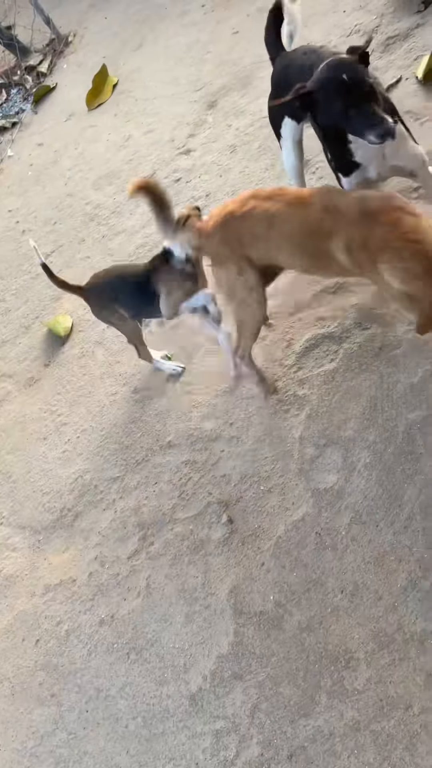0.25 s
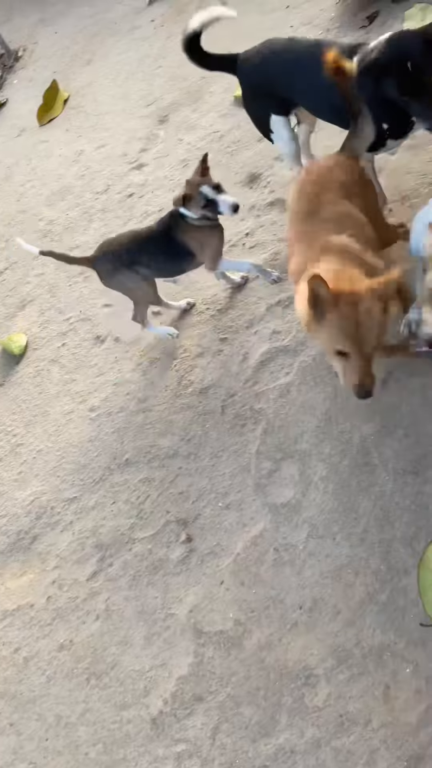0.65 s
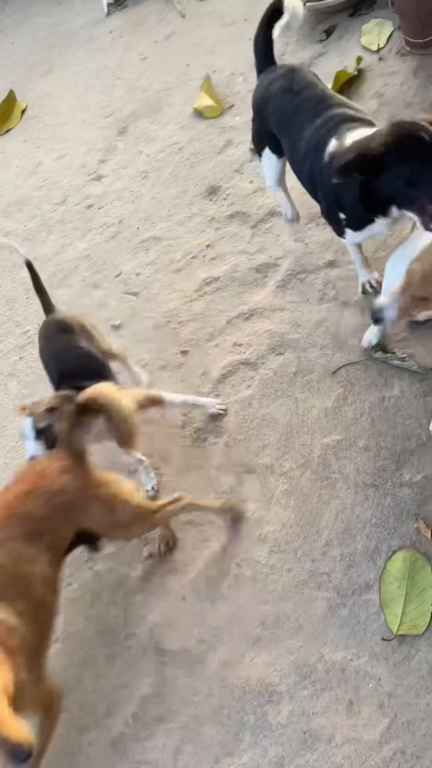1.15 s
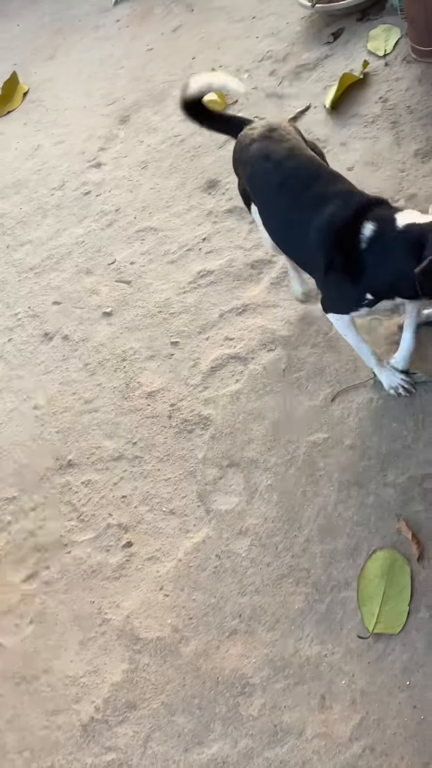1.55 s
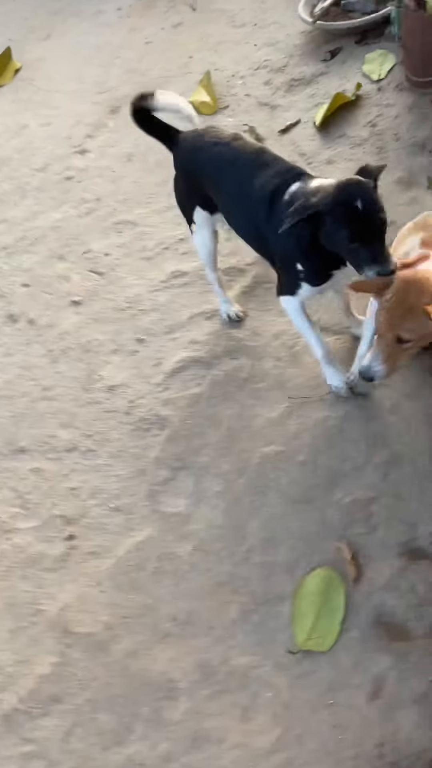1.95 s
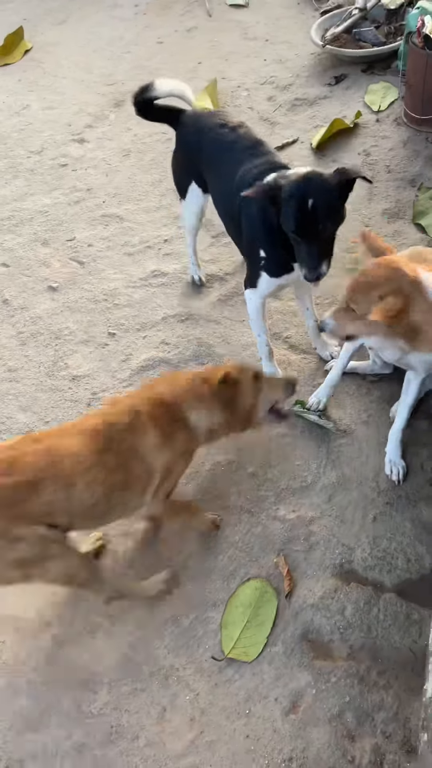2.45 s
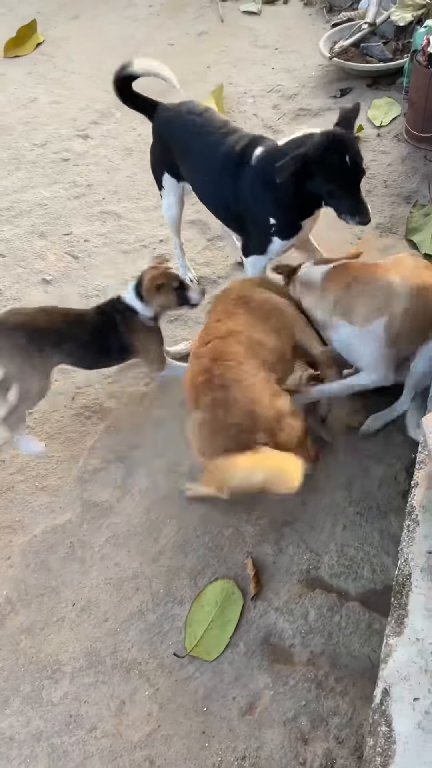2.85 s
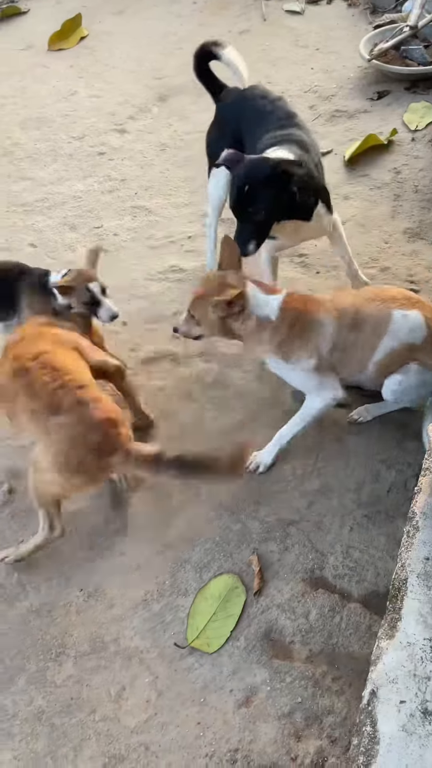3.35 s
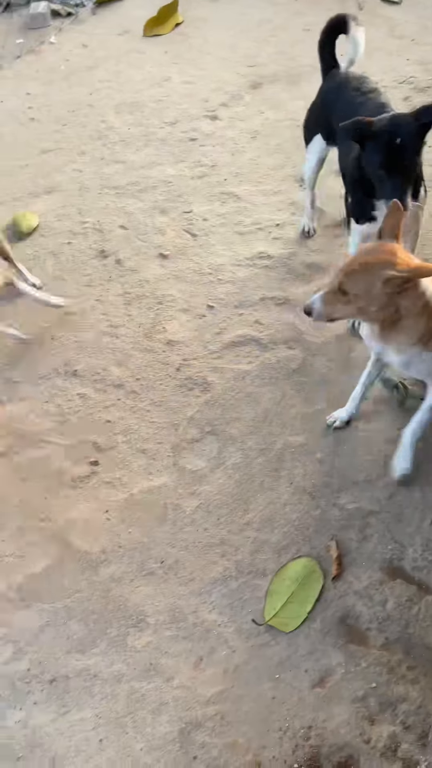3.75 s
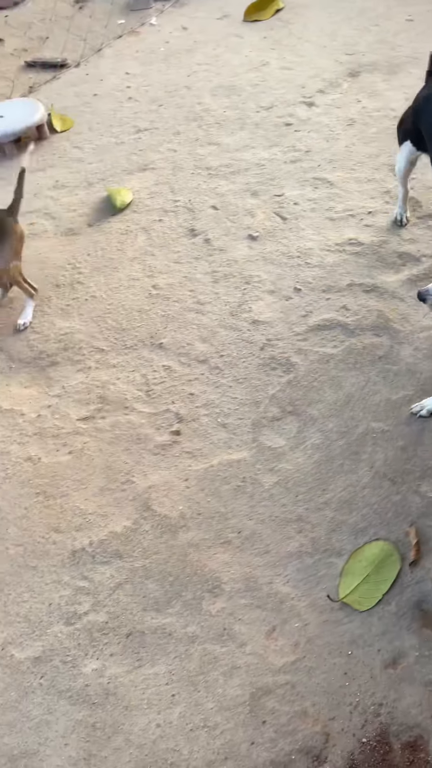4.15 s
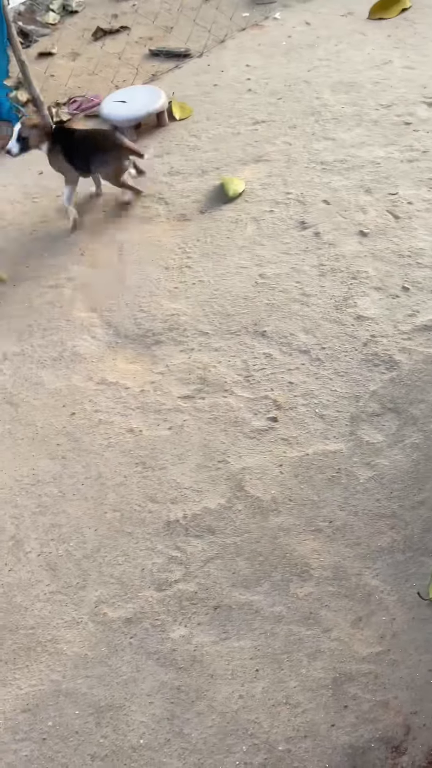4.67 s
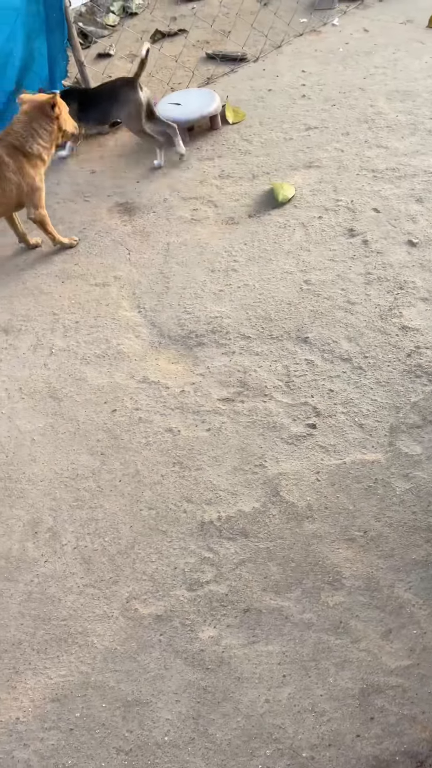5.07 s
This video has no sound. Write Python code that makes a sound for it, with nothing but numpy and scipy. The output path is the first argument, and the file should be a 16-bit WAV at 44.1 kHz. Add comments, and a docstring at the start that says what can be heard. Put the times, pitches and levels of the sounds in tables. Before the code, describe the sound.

Young dogs scuffle in a sandy yard, close to a hand-held stereo microphone. They growl in short, rough bursts while their paws scrape and skid, with small dry snaps in between. After a pause the growling returns, and a sharp yap and a single bark stand out. Softer growls follow and give way to faint scraping. An engine idles low in the background throughout.

```python
"""Sandy yard, close to a hand-held stereo microphone: young dogs growl, whine, yap, bark and scuffle.
Vocal fold pulses and breath puffs strike chest, throat and mouth resonances; whines are nasal air.
Paws scrape and skid on sand (grainy noise), amid dry snaps and faint ticks (short noise bursts).
An engine idles behind: firing orders over a broad roar. A wall throws the voices back."""
import sys
import numpy as np
from scipy import signal
from scipy.fft import rfft, irfft
from scipy.io import wavfile
from scipy.ndimage import uniform_filter1d

SR = 44100
rng = np.random.default_rng(int(sys.argv[2]) if len(sys.argv) > 2 else 0)


def generate_wav(sig):
    """Save sig (samples, or channels by samples) to the path in sys.argv[1] as 16-bit PCM at SR."""
    pcm = np.round(np.clip(np.atleast_2d(sig).T, -1, 1) * 32767).astype(np.int16)
    wavfile.write(sys.argv[1], SR, pcm)


N = 234225

IDLE = [(0.0, 25.52, -40, -39), (1.5, 24.83, -42.5, -39.5), (2.2, 25.15, -39, -35.5),
        (3.3, 25.84, -39.5, -37), (3.9, 26.29, -34.5, -35), (5.31, 27.09, -32.5, -36)]  # t/s, firing cycle f/Hz, orders level/dB, roar level/dB
ENGINE_ORDERS = [(2, -23), (3, -0.5), (4, -9), (5, -7.5), (6, -6)]  # multiple of the cycle, level/dB
ROAR_SPECTRUM = [(15, -37), (25, -6), (57, -8), (94, 1.5), (165, -4), (214, -7.5), (385, -19), (711, -21),
                 (1440, -25), (1740, -30.5), (2540, -31.5), (5800, -43.5), (7000, -60), (9100, -95),
                 (15400, -120)]  # f/Hz, level/dB
ROAR_COHERENCE = [(60, 1), (170, 1), (400, .8), (700, .4), (1500, .3), (4400, -.2)]  # f/Hz, L-R correlation
ROAR_BALANCE = [(60, -0.5), (180, 4), (510, 7.5), (1490, 4), (4360, -1)]  # f/Hz, L-R/dB

SCRAPES = [(.0, 0.27, -46.5, -3.5), (0.175, 0.2, -44, 0), (0.367, 0.12, -51.5, -27),
           (0.551, 0.54, -49.5, 1), (0.786, 0.37, -47, -18), (1.11, 0.12, -46.5, -26),
           (1.17, 0.35, -48.5, -5.5), (1.448, 0.25, -51.5, -12), (1.637, 0.17, -47.5, -1),
           (1.747, 0.2, -58, 9), (1.885, 0.23, -56.5, 4), (2.104, 0.063, -52, 3), (2.2, 0.28, -55, 0.5),
           (2.389, 0.27, -41, -1.5), (2.618, 0.34, -43, -3.5), (2.847, 0.46, -52, -0.5),
           (3.303, 0.19, -54, -13), (3.482, 0.33, -45.5, -9), (3.795, 0.25, -51, -18),
           (4.095, 0.22, -50.5, -20), (4.23, 0.21, -51.5, 1), (4.333, 0.16, -44.5, -2),
           (4.483, 0.084, -63, 14), (4.645, 0.14, -55.5, 6.5), (4.75, 0.21, -62.5, 2)]  # paw strokes: t/s, length/s, sand level/dB, grit re sand/dB
SAND_SPECTRUM = [(700, -20.5), (2000, -0.5), (3400, 1), (3900, 2.5), (4450, -2.5), (5000, -3), (5600, -0.5),
                 (6400, -4.5), (7000, -15)]  # f/Hz, level/dB
GRIT_SPECTRUM = [(7000, -10), (9000, 2), (12000, 6), (13500, -3)]  # f/Hz, level/dB
SNAPS = [(0.349, -39, 8750), (0.476, -45.5, 3840), (1.055, -45, 5800), (1.181, -46, 10500),
         (1.2254, -40, 3600), (1.258, -43, 10500), (1.4426, -45, 3800), (1.6104, -49, 4620),
         (1.6786, -33.5, 4160), (1.7074, -42, 10100), (1.718, -36, 4300), (1.739, -34, 3350),
         (1.7514, -42, 3540), (1.9894, -37, 4030), (2.123, -43, 3980), (2.3775, -48, 5000),
         (2.389, -38, 1350), (2.49, -41, 6000), (2.8813, -40.5, 5270), (3.154, -44, 3300),
         (3.326, -46.5, 3355), (3.446, -48, 3890), (3.898, -42, 5000), (4.0306, -44, 3660),
         (4.219, -39.5, 3320), (4.2736, -43, 5000)]  # dry snaps and faint short ticks: t/s, level/dB, f/Hz
SKID = [(1.87, -57.5, 1100), (1.92, -37.5, 880), (1.96, -36, 1480), (2.02, -51.5, 3000)]  # hiss of a sliding paw: t/s, level/dB, f/Hz
SKID_THUD = (224, 187, 1.2)  # ground boom: f/Hz, width/Hz, level re hiss/dB

# One curve per growl: t/s, pitch f/Hz, then level/dB of hum, chest, mouth 1, mouth 4
GROWLS = [
    [(0, 90.86, -31.5, -34, -38, -45), (.1, 116.1, -32, -31.5, -33.5, -55),
     (.16, 92.75, -34.5, -27, -34, -40.5), (.22, 100.4, -30.5, -28.5, -37.5, -40),
     (.26, 92.8, -35.5, -33, -53, -47), (.32, 90.6, -40, -35, -63, -54)],
    [(.55, 95.27, -49, -34, -57, -47), (.6, 99.9, -33, -27.5, -41, -46),
     (.7, 103.5, -25.5, -36, -32, -33.5), (.8, 106.8, -35.5, -29.5, -32.5, -39),
     (.89, 103.9, -28, -33, -35.5, -40.5), (.95, 86.5, -28.5, -26.5, -37.5, -36.5),
     (.995, 80.5, -35, -35, -44, -41.5), (1.06, 77, -47, -50, -46, -57)],
    [(1.04, 139.4, -57, -47, -49.5, -61), (1.16, 137.6, -47.5, -42, -45, -54),
     (1.27, 136.1, -56, -41, -39, -44.5), (1.33, 138, -52, -34.5, -40, -63),
     (1.4, 134.4, -68, -35.5, -36.5, -48.5), (1.48, 121.9, -43, -44, -50, -67)],
    [(2.4, 118, -53, -42, -51, -43), (2.425, 118, -42, -31, -35.5, -48), (2.435, 119.9, -31, -33, -30, -36),
     (2.49, 121.5, -29, -29, -41, -42), (2.55, 125.1, -39, -25.5, -36.5, -36.5),
     (2.59, 122.2, -55, -24, -49, -51), (2.64, 117, -27, -40, -71, -61)],
    [(2.65, 112.2, -27, -31, -43.5, -52), (2.68, 115.8, -29, -29, -41.5, -50),
     (2.692, 119.2, -47, -20.5, -36.5, -41.5), (2.75, 120.8, -36, -23.5, -39, -44),
     (2.8, 118.3, -34, -20.5, -39.5, -35.5), (2.9, 112.9, -45, -24.5, -43.5, -49.5),
     (2.97, 108.2, -31, -24, -41.5, -40.5), (3.05, 100, -48, -28, -49, -43)],
    [(3.495, 84.2, -49, -49, -42, -55), (3.53, 89.47, -47, -35.5, -34, -46.5),
     (3.575, 99.15, -33.5, -27, -24, -37), (3.605, 98.5, -29.5, -26.5, -26, -30.5),
     (3.645, 92, -40, -36, -45, -45)],
    [(3.72, 93.3, -40.5, -31.5, -44, -71), (3.79, 91.75, -38, -41, -30.5, -46),
     (3.95, 91.7, -59, -33.5, -34.5, -47), (4.05, 91.85, -58, -41.5, -44, -44.5),
     (4.14, 93, -39, -43.5, -39.5, -49.5), (4.235, 92, -38, -55, -58, -49)],
    [(4.22, 92.44, -42, -56, -43, -62), (4.28, 91.95, -48, -39, -40.5, -50.5),
     (4.36, 91.34, -35, -34, -36, -39), (4.46, 92.8, -49, -47.5, -58, -46.5)],
]
# One row per growl: roughness 0-1, clear onset/s, upper chest re chest/dB, mouth L-R/dB,
# then (start, end) pairs: chest f/Hz, throat re mouth 1/dB, mouth 1 f/Hz, mouth 2 f/Hz,
# mouth 2 re 1/dB, mouth 3 f/Hz, mouth 4 f/Hz, mouth 3 re 4/dB
GROWL_MANNER = [(.55, .12, -9.5, -2.5, (180, 160), (1.1, -2.5), (825, 916), (1250, 1060), (-10, 8.3),
                (1900, 1960), (2200, 2980), (2.2, -3)), (.52, .11, -8.5, -1, (192, 155), (-2, -4),
                (824, 750), (1280, 1060), (0.73, -9), (2040, 1770), (2290, 2820), (-5.5, 3)),
                (.6, 0.031, -2.5, 0, (202, 214), (-1.6, -13.5), (750, 767), (1335, 1510), (2.3, -9.5),
                (2050, 1900), (2980, 2510), (0.5, 2.3)), (0.51, .05, -11.5, -1.5, (188, 186), (-1.8, -15),
                (854, 1010), (940, 1280), (-5, 8.2), (1970, 2100), (2410, 2600), (-2, -10)),
                (0.66, .02, -10.5, -1, (177, 205), (-0.5, 12.2), (840, 750), (1385, 820), (1.1, -2),
                (1940, 2150), (2430, 2450), (-3.5, -2)), (0.5, .02, -7.5, -0.5, (190, 193), (-18, -26),
                (805, 640), (1290, 1350), (-6, -30), (1810, 1960), (2660, 2500), (14.3, 3.9)),
                (.68, 0.0084, 1.5, 0.5, (193, 174), (-14, -18), (795, 783), (660, 1160), (-23, -1.7),
                (1820, 2080), (2500, 2550), (10.4, -6.5)), (0.64, .02, -1, 0.5, (196, 203), (-20, -19),
                (730, 745), (930, 930), (-1.4, -2), (1930, 1990), (2570, 2580), (-3.5, 1))]
GROWL_WIDTHS_HZ = [112, 129, 233, 264, 314]  # throat, mouth 1-4: width/Hz
RASP = (1103, 620, 0)  # broad band between resonances: f/Hz, width/Hz, level re mean of mouth 2 and 3/dB
UPPER_THROAT = [(3190, 320, -9), (5900, 2100, -20.5), (10600, 3000, -21.5)]  # resonances: f/Hz, width/Hz, level re mouth 4/dB
RINGS = [(.03, 0.091, 1840, 2060, -46), (.125, 0.05, 2420, 2480, -41), (.17, 0.07, 1170, 1224, -38),
         (0.214, 0.046, 3650, 3670, -40), (0.246, 0.033, 2400, 2500, -45), (0.638, 0.033, 830, 820, -31.5),
         (0.688, 0.061, 1310, 1120, -35), (.715, 0.037, 2830, 2820, -37), (0.802, 0.043, 2353, 2370, -33),
         (0.828, 0.14, 754, 730, -32), (.93, 0.052, 2000, 1870, -32), (1.229, 0.084, 1175, 1050, -33.5),
         (1.26, 0.073, 686, 724, -36.5), (1.347, 0.11, 744, 964, -30), (2.423, 0.11, 785, 1010, -32.5),
         (2.432, 0.047, 2370, 2540, -36), (2.5, 0.044, 1940, 2320, -41), (2.537, 0.026, 3640, 3680, -39),
         (2.681, 0.041, 1545, 1520, -38), (2.77, 0.039, 2570, 2440, -35.5), (2.823, 0.064, 2360, 2140, -38),
         (2.898, 0.051, 1250, 1450, -41), (3.764, 0.12, 856, 800, -29.5), (3.868, 0.25, 810, 740, -37),
         (4.121, 0.094, 1080, 1180, -43.5), (4.235, .1, 2470, 2430, -43)]  # brief mouth resonances: t/s, length/s, start f/Hz, end f/Hz, level/dB
WHINES = [(0.311, 0.16, 1720, 1755, -54), (0.395, 0.086, 2670, 2680, -54), (1.116, 0.078, 2270, 2110, -44)]  # nasal whistles: t/s, length/s, start f/Hz, end f/Hz, level/dB

# Call curves: t/s, level/dB, pitch f/Hz, roughness 0-1, mouth opening (factor on resonance f)
YAP = [(3.0, -21.5, 448.3, 0.55, 0.87), (3.014, -23, 466.8, 0.9, 1.01), (3.031, -31, 462.4, 0.7, 1.0),
       (3.049, -20, 459.5, 0.7, 0.963), (3.054, -8, 461.3, 0.45, 0.95), (3.069, -10, 499.8, 0.43, 1.017),
       (3.079, -10, 449, 0.9, 1.027), (3.094, -29, 424.6, 0.9, 0.68), (3.102, -29.5, 398.3, 0.6, 0.75),
       (3.12, -20, 394, 0.45, 0.91), (3.14, -36, 375, 0.6, 0.65), (3.201, -51, 353, 1, 0.87)]
BARK = [(3.59, -35, 322.6, 0.34, 1.14), (3.602, -18, 340.5, 0.37, 0.82), (3.616, -16.5, 366.4, .22, 1),
        (3.635, -15.5, 354.2, 0.25, 1.043), (3.66, -15.5, 349.3, 0.21, 1), (3.687, -22, 338.5, 0.21, 0.986),
        (3.705, -32, 340, 0.67, 1.05), (3.723, -48, 340, 0.84, 0.57)]
# Their resonances: f/Hz, width/Hz, level/dB
YAP_THROAT = [(710, 290, -11), (950, 238, 3), (1363, 120, -8.5), (1814, 310, -8.5), (2470, 160, -16),
              (3270, 360, -11), (12200, 1400, -24.5)]
BARK_THROAT = [(803, 214, 3.5), (1140, 67, -20), (1395, 70, -10), (1914, 260, 2), (2420, 270, 3),
               (3300, 340, -8), (3580, 270, -11.5), (4600, 1600, -42), (9400, 3000, -31)]
CALL_PANS_DB = [-1.5, 0]  # yap, bark: L-R/dB

WALL_ECHOES = [(.05, -25)]  # delay/s, level/dB
YARD_SPECTRUM = [(200, -40), (500, 0), (3000, 0), (8000, -14)]  # echo and tail: f/Hz, level/dB
PORT_PHASE = [(600, -1.1), (900, -1.23), (1300, -0.67), (1980, 0.5), (2500, -1.38), (3600, -1.5),
              (4300, -2), (5300, 0.5), (7000, 3), (9000, 4), (12500, 8)]  # microphone ports: f/Hz, left lead/rad
PORT_BALANCE = [(60, 0), (200, 1.5), (350, 6.5), (800, 1.5), (12000, -0.5)]  # f/Hz, L-R/dB
# Overall tone colour (bass cut, dull gap near 8 kHz, little above 13 kHz): f/Hz, level/dB
TONE_COLOUR = [(20, -20), (45, -2.5), (70, -1.5), (6300, 1), (6950, 3.5), (7300, -17), (8100, -13),
               (8600, -1.5), (9200, -1.5), (12600, -11), (13300, -8.5), (13700, -36), (15000, -49)]


def gain_of(db):
    return 10 ** (np.asarray(db) / 20)


def pan(left_right_db):
    return gain_of([[left_right_db / 2], [-left_right_db / 2]])


def unit_rms(x):
    return x / np.sqrt(np.mean(x ** 2) + 1e-20)


def lookup(points, hz):
    """Table value at hz, on a log axis."""
    table_hz, value = np.transpose(points)
    return np.interp(np.log(hz + 1), np.log(table_hz + 1), value)


def follow(rows):
    """Start time and per-sample columns of a curve."""
    times_s, *columns = np.transpose(rows)
    t = np.arange(times_s[0], min(times_s[-1], N / SR), 1 / SR)
    return times_s[0], [np.interp(t, times_s, column) for column in columns]


def add(mix, start_s, sound):
    part = mix[..., round(start_s * SR):][..., :sound.shape[-1]]
    part += sound[..., :part.shape[-1]]


def resonate(x, hz, width_hz):
    """Gliding resonance: shift to 0 Hz, smooth twice, shift back."""
    carrier = np.exp(2j * np.pi * np.cumsum(hz * np.ones(len(x))) / SR)
    pole = np.exp(-np.pi * width_hz / SR)
    smoothed = signal.lfilter([(1 - pole) ** 2], [1, -2 * pole, pole * pole], x * carrier.conj())
    return 2 * (carrier * smoothed).real


def colour(x, spectrum):
    hz = np.fft.rfftfreq(x.shape[-1], 1 / SR)
    return irfft(rfft(x) * gain_of(lookup(spectrum, hz)), x.shape[-1])


def wander(n, span_samples):
    """Slow random drift, rms 1."""
    span = int(span_samples)
    return unit_rms(uniform_filter1d(uniform_filter1d(rng.standard_normal(n), span), span))


def patches(shape, bins, frames):
    """Random time-frequency blotches, rms 1."""
    return unit_rms(uniform_filter1d(uniform_filter1d(rng.standard_normal(shape), bins, 0), frames, 1))


def engine_roar():
    """Broad, patchy noise; L and R alike in the bass."""
    hz = np.fft.rfftfreq(1024, 1 / SR)[:, None]
    shape = (2, len(hz), N // 256 + 5)
    left, independent = rng.standard_normal(shape) + 1j * rng.standard_normal(shape)
    coherence = lookup(ROAR_COHERENCE, hz)
    right = coherence * left + np.sqrt(1 - coherence ** 2) * independent
    level_db = lookup(ROAR_SPECTRUM, hz) + 2.3 * patches(left.shape, bins=10, frames=12)
    side_db = lookup(ROAR_BALANCE, hz) / 2
    spectra = np.array([left, right]) * gain_of([level_db + side_db, level_db - side_db])
    return unit_rms(signal.istft(spectra, nperseg=1024, noverlap=768)[1][:, :N])


def engine():
    """Wavering orders of the firing cycle, L and R in phase, slightly louder left, over the roar."""
    cycle_hz, orders_db, roar_db = (np.pad(curve, (0, N), "edge")[:N] for curve in follow(IDLE)[1])
    turns = np.cumsum(cycle_hz * (1 + 0.011 * wander(N, 2750))) / SR
    orders = sum(gain_of(db + 1.77 * wander(N, 2100)) * np.cos(2 * np.pi * (order * turns + rng.random()))
                 for order, db in ENGINE_ORDERS)
    return np.sqrt(2) * gain_of(orders_db) * orders * pan(2) + gain_of(roar_db) * engine_roar()


def sand_grains():
    """Spiky noise; patches of about 30 ms by 1 kHz swell and fade."""
    spikes = rng.standard_normal((3, N)) * gain_of(2.8 * np.minimum(rng.exponential(1, N), 7))
    grains = spikes[0] + 0.5 * spikes[1:]  # common part plus one per side
    spectra = signal.stft(grains, nperseg=256, noverlap=128)[2]
    spectra *= gain_of(4 * patches(spectra.shape[1:], bins=6, frames=10))
    return signal.istft(spectra, nperseg=256, noverlap=128)[1][:, :N]


def scrapes(sand_floor_db=-67.5, grit_floor_db=-67, skew=0.77):
    """Sand and fine grit hiss in clumps under the paws, over a constant faint shuffle."""
    powers = np.ones((2, N)) * gain_of([[sand_floor_db], [grit_floor_db]]) ** 2
    for start_s, length_s, db, grit_db in SCRAPES:
        stroke = np.sin(np.pi * np.linspace(0, 1, int(length_s * SR)) ** skew)  # peaks early
        add(powers, start_s, (gain_of([[db], [db + grit_db]]) * stroke) ** 2)
    shared_db = 1.6 * wander(N, 1100)
    grains = sand_grains()
    hiss = np.zeros((2, N))
    for power, spectrum in zip(powers, (SAND_SPECTRUM, GRIT_SPECTRUM)):
        clumps = gain_of(shared_db + 1.3 * wander(N, 230) + 0.48 * wander(N, 900))
        hiss += np.sqrt(power) * unit_rms(colour(clumps * grains, spectrum))
    return hiss


def folds(hz, jitter):
    """Running count of jittered vocal fold cycles."""
    detune = np.clip(jitter * wander(len(hz), SR / hz.mean() / 2), -.7, .7)
    return np.cumsum(hz * (1 + detune)) / SR


def rattle(turns, rough, hz, width_hz, uneven_db, shift, puff_cycles):
    """Resonance struck each cycle by a pulse and a noise puff; strength and centre vary per cycle."""
    cycle = turns.astype(int)
    noise, strength, detune = rng.standard_normal((len(turns), 3)).T
    pulses = unit_rms(np.diff(cycle, prepend=0))
    puffs = unit_rms((.2 + np.exp(-(turns % 1) / puff_cycles)) * noise)
    cycle_gain = gain_of(uneven_db * rough * np.clip(strength[cycle], -2, 2))
    drive = cycle_gain * ((1 - rough) * pulses + rough * puffs)
    centre_hz = hz * (1 + shift * uniform_filter1d(detune[cycle], size=60))
    return unit_rms(resonate(drive, centre_hz, width_hz))


def growl(rows, rough, clear_s, upper_db, pan_db, *pairs, break_up_s=.03):
    """Slow fold pulses hum and rattle chest, throat and mouth; the voice breaks up after its onset."""
    start_s, (pitch_hz, hum_db, chest_db, db1, db4) = follow(rows)
    n = len(pitch_hz)
    glides = (np.linspace(*pair, n) for pair in pairs)
    chest_hz, throat_db, hz1, hz2, over2_db, hz3, hz4, over3_db = glides
    broken = .4 + .6 * np.clip((np.arange(n) / SR - clear_s) / break_up_s, 0, 1)
    turns = folds(pitch_hz, jitter=.17 * rough * broken)
    hum = -np.sqrt(2) * np.sin(2 * np.pi * turns)  # pressure falls as the folds shut
    hum *= gain_of(hum_db + 3.1 * broken * wander(n, 580))
    lower = rattle(turns, .4 * broken, chest_hz, width_hz=63.5, uneven_db=1.1, shift=.0095, puff_cycles=.35)
    upper = rattle(turns, .38 * broken, hz=296.7, width_hz=77, uneven_db=6, shift=.017, puff_cycles=.2)
    chest = gain_of(chest_db) * (lower + gain_of(upper_db) * upper)
    throat_hz, db2, db3 = 518, db1 + over2_db, db4 + over3_db
    bands = list(zip((throat_hz, hz1, hz2, hz3, hz4), GROWL_WIDTHS_HZ,
                     (db1 + throat_db, db1, db2, db3, db4)))
    rasp_hz, rasp_width_hz, rasp_db = RASP
    bands += [(rasp_hz, rasp_width_hz, (db2 + db3) / 2 + rasp_db)]
    bands += [(hz * hz4 / hz4.mean(), width_hz, db4 + db) for hz, width_hz, db in UPPER_THROAT]
    mouth = sum(gain_of(db + wander(n, 1000))
                * rattle(turns, rough, hz, width_hz, uneven_db=4.5, shift=.043, puff_cycles=1)
                for hz, width_hz, db in bands)
    voice = hum + chest + pan(pan_db) * (mouth + rings(start_s, turns))
    return start_s, voice * signal.windows.tukey(n, 800 / n)


def rings(growl_s, turns):
    """Single mouth resonances stand out briefly, driven by the growl's fold pulses."""
    out = np.zeros(len(turns))
    for start_s, length_s, from_hz, to_hz, db in RINGS:
        part = turns[max(round((start_s - growl_s) * SR), 0):][:int(length_s * SR)]
        if start_s >= growl_s and len(part) > 100:
            ring = rattle(part - part[0] // 1, rough=.56, hz=np.linspace(from_hz, to_hz, len(part)),
                          width_hz=132, uneven_db=1.6, shift=.014, puff_cycles=.73)
            add(out, start_s - growl_s, gain_of(db) * ring * signal.windows.tukey(len(part), .6))
    return out


def whine(start_s, length_s, from_hz, to_hz, db):
    """Air through the nose: a fuzzy whistle."""
    hz = np.linspace(from_hz, to_hz, int(length_s * SR))
    whistle = unit_rms(resonate(rng.standard_normal(len(hz)), hz, width_hz=93))
    return start_s, gain_of(db) * whistle * signal.windows.tukey(len(hz), .6)


def snap(start_s, db, hz, t60_s=0.023):
    """Dry snap or faint tick: bright noise plus one resonance, fast decay."""
    t = np.arange(2500) / SR
    noise = rng.standard_normal(len(t))
    crack = unit_rms(resonate(noise, hz, width_hz=810)) + 1.56 * np.diff(noise, prepend=0)
    return start_s, gain_of(db - 60 * t / t60_s) * crack


def skid():
    """A paw slides: the hiss rises, the ground booms."""
    start_s, (db, hz) = follow(SKID)
    thud_hz, thud_width_hz, thud_db = SKID_THUD
    rub = rng.standard_normal(len(hz))
    hiss = unit_rms(resonate(rub, hz, width_hz=3200))
    thud = gain_of(thud_db) * unit_rms(resonate(rub, thud_hz, thud_width_hz))
    return start_s, gain_of(db) * (hiss + thud) * signal.windows.tukey(len(hz), .2)


def bark(rows, throat, pan_db, flutter_hz=51.9):
    """Fast fold pulses through an open throat; resonances rise and brighten as the mouth widens."""
    start_s, (effort_db, pitch_hz, rough, opening) = follow(rows)
    n = len(pitch_hz)
    turns = folds(pitch_hz, jitter=.04 * rough)
    tilt_db_per_octave = 12 * (opening - 1)
    voice = sum(gain_of(db + tilt_db_per_octave * np.log2(hz / throat[0][0]))
                * rattle(turns, rough, hz * opening, width_hz, uneven_db=1.2, shift=.027, puff_cycles=.19)
                for hz, width_hz, db in throat)
    throb_db = np.cos(2 * np.pi * flutter_hz * np.arange(n) / SR)  # slower flutter of the folds
    envelope = gain_of(effort_db + throb_db) * signal.windows.tukey(n, .08)
    return start_s, envelope * unit_rms(voice) * pan(pan_db)


def yard(x, t60_s=.18, tail_db=-12):
    """Adds a wall echo and a short diffuse tail, separate tail taps per side."""
    t = np.arange(SR // 2) / SR
    taps = rng.standard_normal((2, len(t))) * (rng.random((2, len(t))) < .05)
    tail = taps * gain_of(-60 * t / t60_s) * (t > .004)
    tail *= gain_of(tail_db) / np.linalg.norm(tail[0])
    for delay_s, db in WALL_ECHOES:
        add(tail, delay_s, gain_of(db) * rng.standard_normal(60) / np.sqrt(60))
    return x + signal.fftconvolve(x.mean(0)[None], colour(tail, YARD_SPECTRUM), axes=1)[:, :N]


def ports(x):
    """Near sounds reach the two microphone ports with unequal phase and level."""
    hz = np.fft.rfftfreq(N, 1 / SR)
    lead_rad = lookup(PORT_PHASE, hz) * np.minimum(hz / PORT_PHASE[0][0], 1)  # long waves arrive in step
    left = gain_of(lookup(PORT_BALANCE, hz) / 2) * np.exp(.5j * lead_rad)
    return irfft(rfft(x) * np.array([left, 1 / left]), N)


def scene():
    """Dogs and paws near, engine behind."""
    scuffle = scrapes()
    dogs = np.zeros((2, N))
    for rows, manner in zip(GROWLS, GROWL_MANNER):
        add(dogs, *growl(rows, *manner))
    for row in WHINES:
        add(dogs, *whine(*row))
    for row in SNAPS:
        add(scuffle, *snap(*row))
    add(scuffle, *skid())
    for call in zip((YAP, BARK), (YAP_THROAT, BARK_THROAT), CALL_PANS_DB):
        add(dogs, *bark(*call))
    return engine() + ports(yard(dogs) + scuffle)


def record(dry):
    """Soft saturation, overall tone colour, 15.8 kHz band limit."""
    saturated = 1.1 * np.tanh(dry / 1.1)
    lowpass = signal.firwin(511, 15800, window=("kaiser", 9), fs=SR)
    return signal.oaconvolve(colour(saturated, TONE_COLOUR), lowpass[None], "same")


dry = scene()
out = record(dry)
generate_wav(out)
```